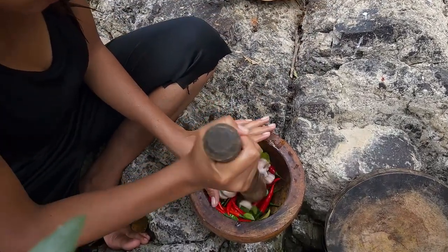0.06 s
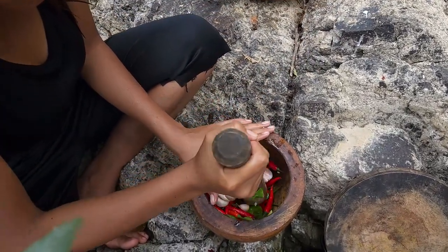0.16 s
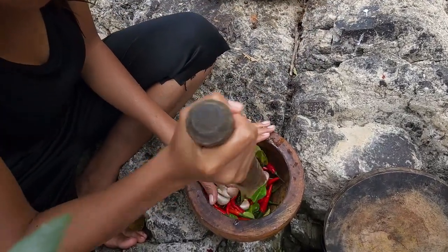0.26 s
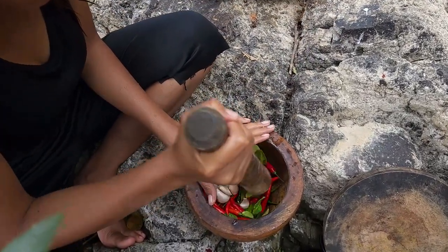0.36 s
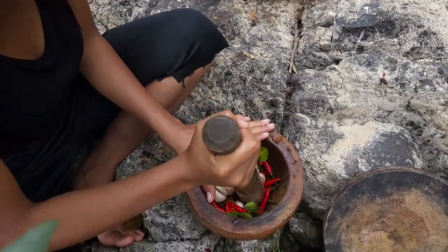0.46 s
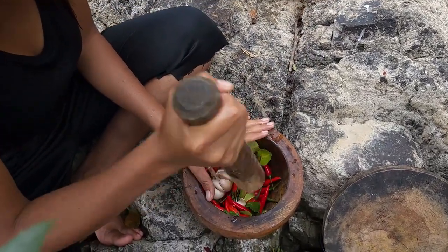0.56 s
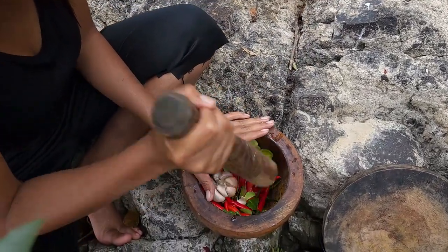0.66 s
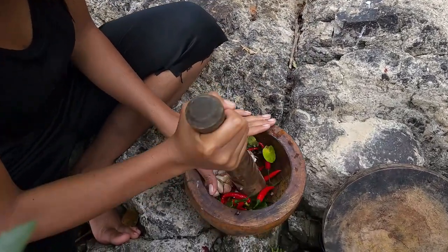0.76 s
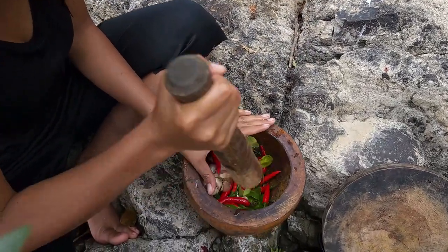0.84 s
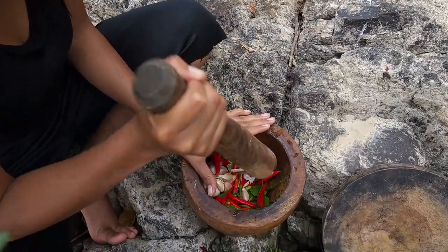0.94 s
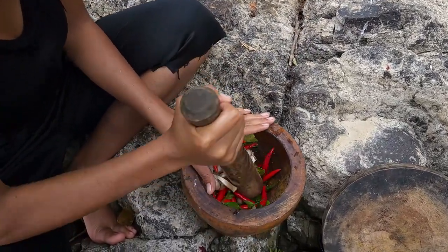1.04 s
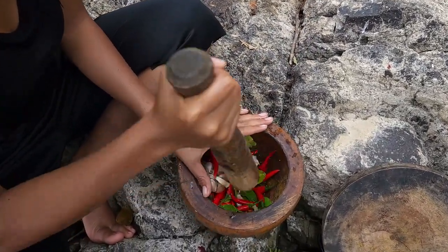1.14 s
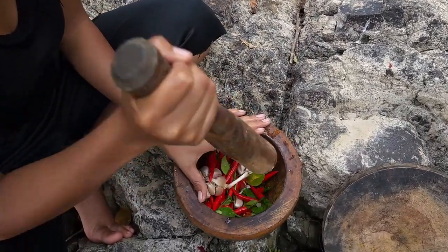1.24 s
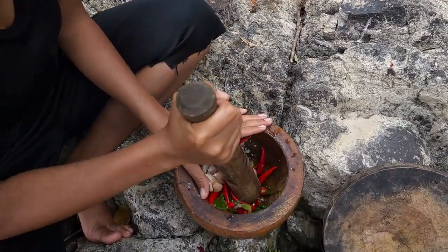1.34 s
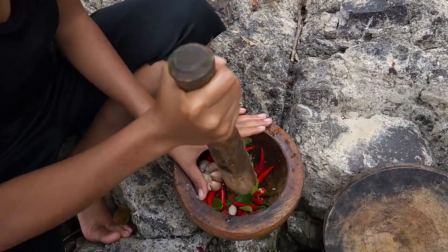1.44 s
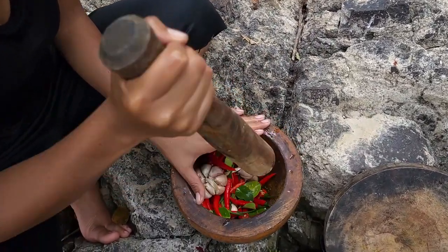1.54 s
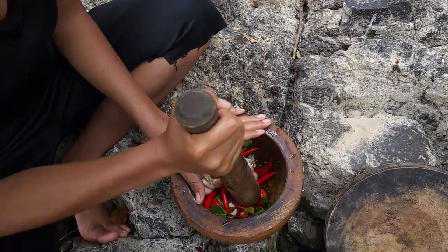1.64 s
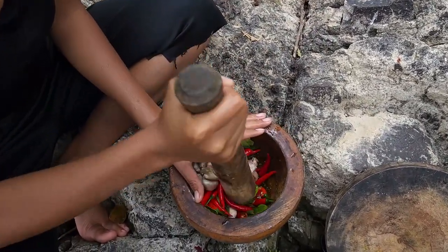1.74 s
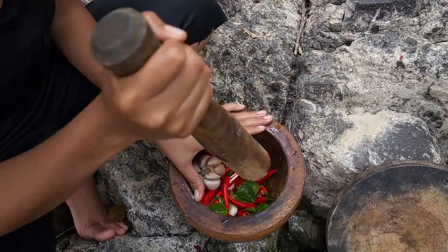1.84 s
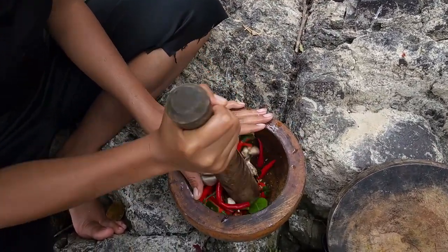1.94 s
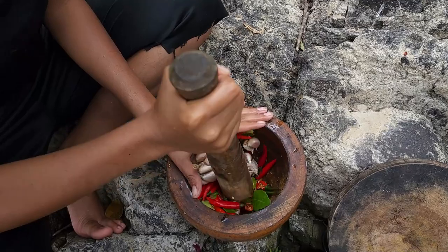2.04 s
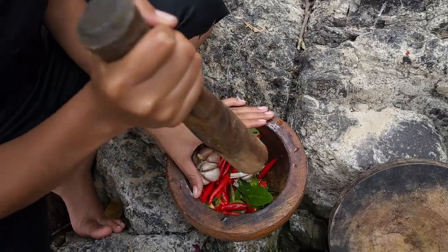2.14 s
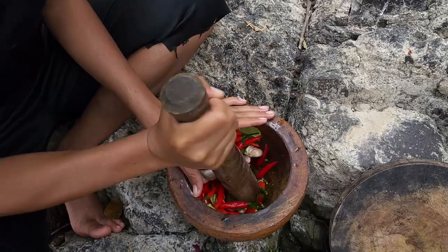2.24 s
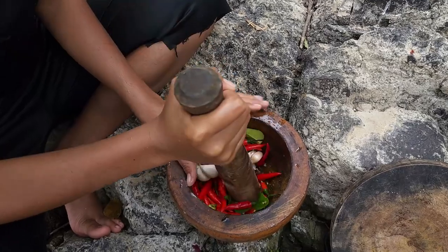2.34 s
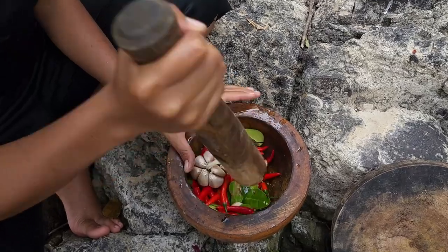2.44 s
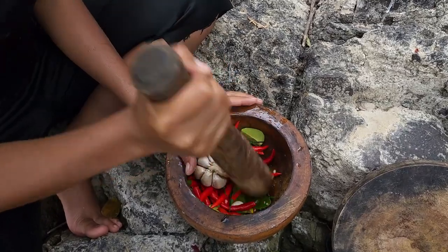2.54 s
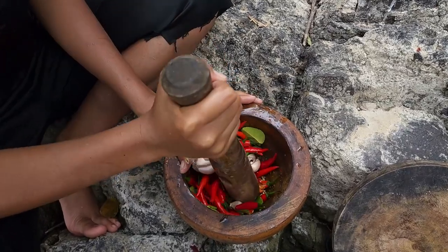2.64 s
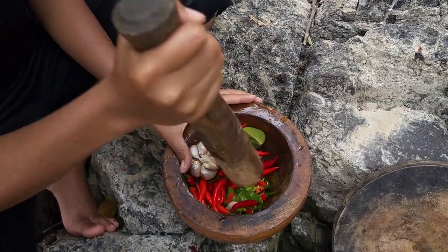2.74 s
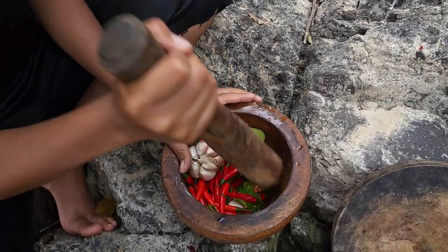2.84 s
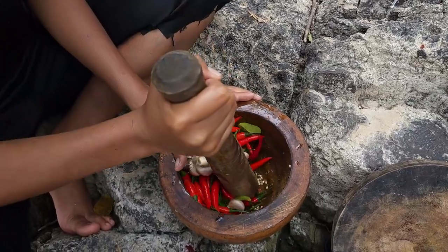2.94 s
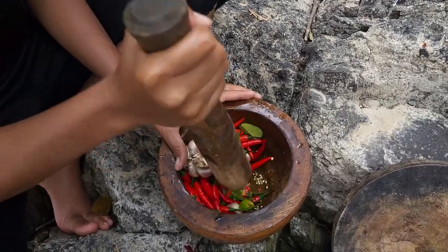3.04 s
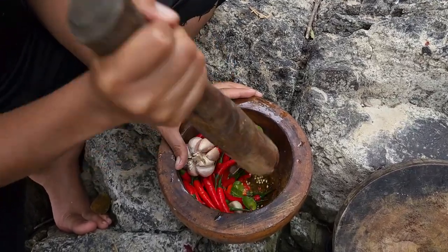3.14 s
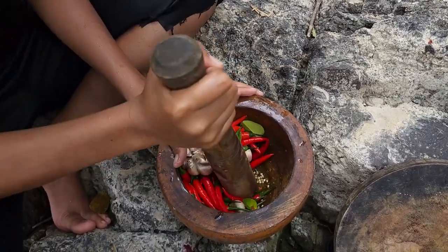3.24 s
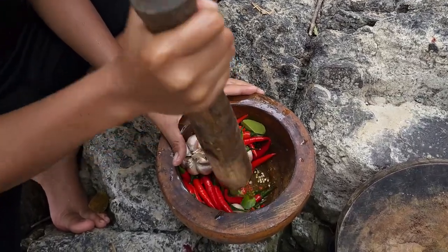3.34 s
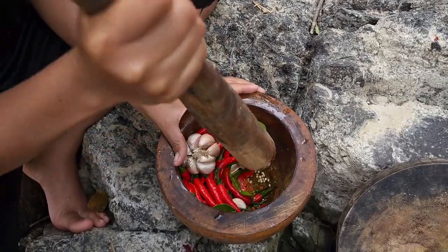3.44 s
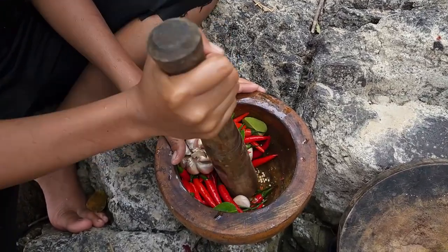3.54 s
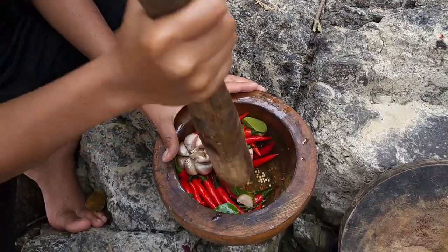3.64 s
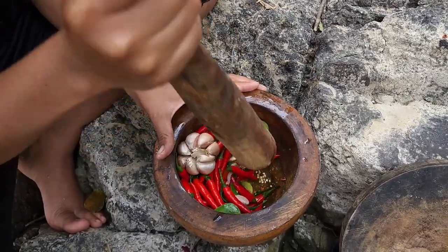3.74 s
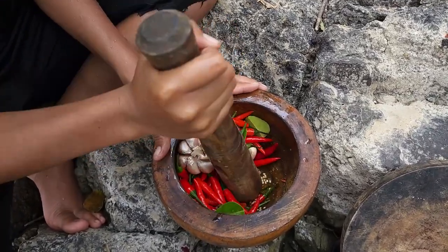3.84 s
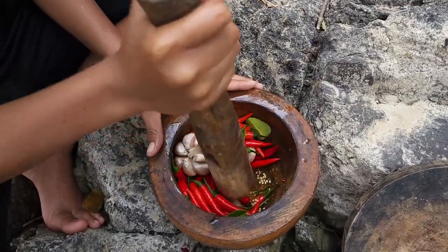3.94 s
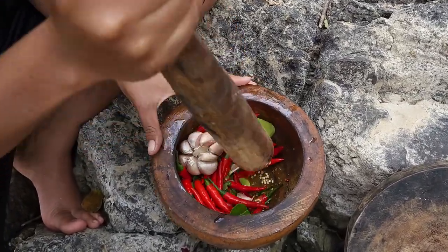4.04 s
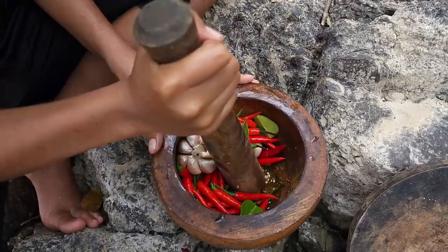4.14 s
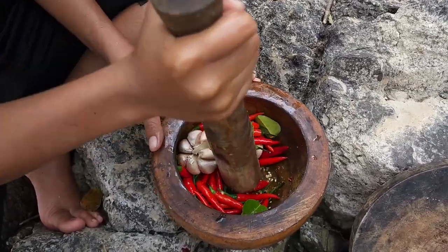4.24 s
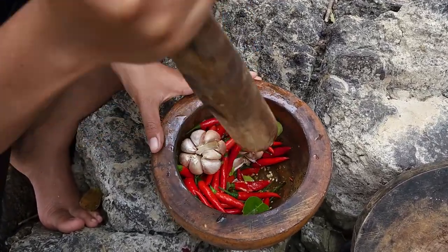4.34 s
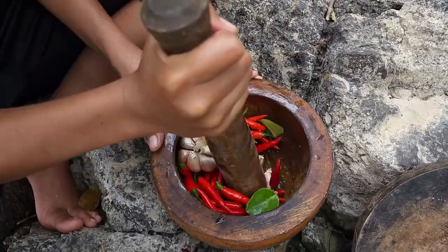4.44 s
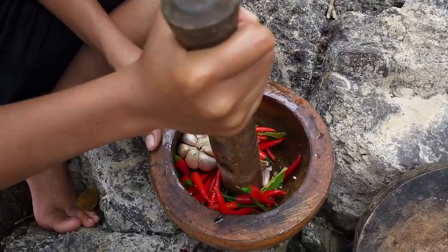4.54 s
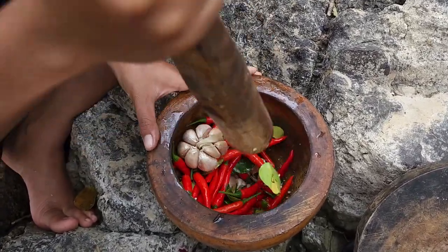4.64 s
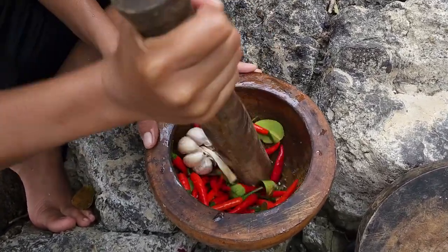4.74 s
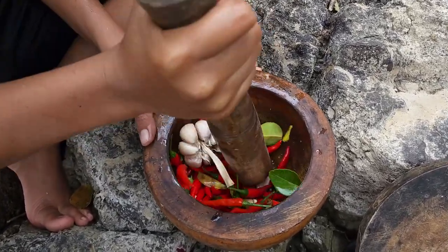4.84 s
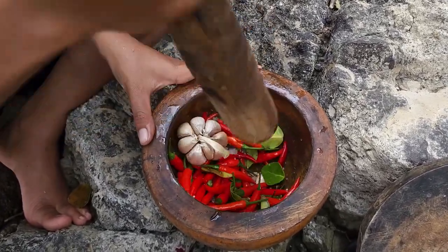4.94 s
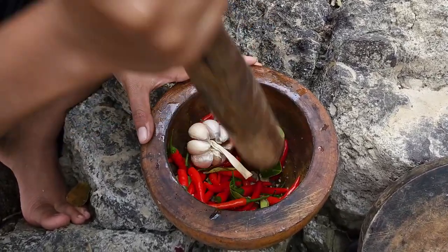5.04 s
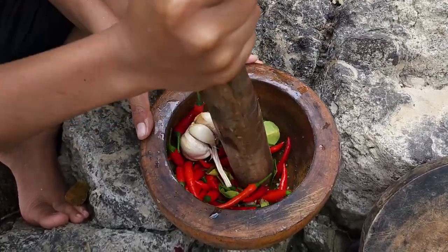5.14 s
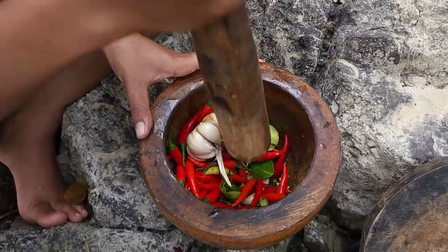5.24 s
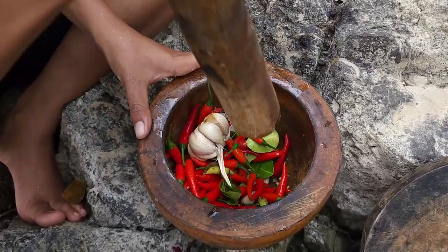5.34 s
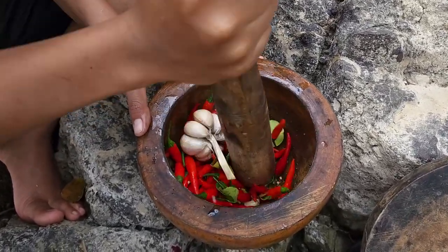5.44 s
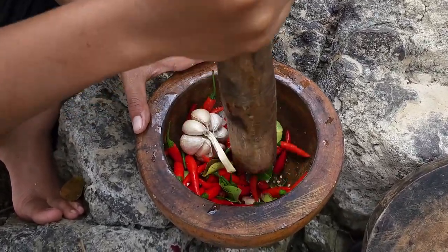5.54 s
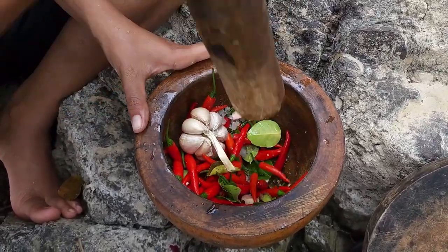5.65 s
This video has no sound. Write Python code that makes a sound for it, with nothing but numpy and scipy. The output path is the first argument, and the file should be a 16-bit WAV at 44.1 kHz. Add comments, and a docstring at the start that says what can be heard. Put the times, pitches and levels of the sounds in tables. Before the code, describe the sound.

Close, dry blows of a wooden pestle in a clay mortar, about three per second, each mixing a low knock with a short wet crunch of chillies. Early blows are duller; around three to four seconds several ring hard and hollow, then they ease. A stream rushes and gurgles steadily beneath, with tiny splashes. Outdoors, close stereo microphones, very little echo.

```python
"""Beside a forest stream, a wooden pestle pounds chillies and leaves in a clay mortar on a rock.
Each blow crushes the filling in a burst of tiny snaps, and its knocks set the bowl ringing.
Splashes and gulps are single rings; the stream is filtered noise with crowds of bubble rings.
Two spaced microphones hear it all; a limiter ducks under the hardest blows and recovers slowly."""
import sys
import numpy as np
from scipy import signal
from scipy.fft import rfft, irfft, next_fast_len
from scipy.io import wavfile
from scipy.ndimage import uniform_filter1d, minimum_filter1d, map_coordinates

SR = 44100
rng = np.random.default_rng(int(sys.argv[2]) if len(sys.argv) > 2 else 0)


def file_out(sig):
    """Save sig as 16-bit WAV at sys.argv[1]."""
    # one column per channel
    cols = np.atleast_2d(sig).T
    # limit, then scale
    lim = np.clip(cols, -1, 1)
    pcm = np.round(lim * 32767).astype(np.int16)
    wavfile.write(sys.argv[1], SR, pcm)


N = 250929
SIZE = next_fast_len(N + 4096)   # transform length, with room for echoes
HZ = np.maximum(np.arange(SIZE // 2 + 1) * SR / SIZE, 1)   # frequency of every bin

# blows of the pestle into the filling: stop_s, crush_db, sink_ms (from first touch to stop),
# touch_db (first touch), fall_ms, treble_db (treble against the rest), thump_db (on the rock)
BLOWS = [(0.1023, -26, 15.3, -38, 7.3, -7.5, -38), (0.4226, -26, 10, -27, 3.8, 3, -30.5),
         (0.7235, -20, 7.7, -30, 5.6, -3.5, -34), (1.03, -28, 14.2, -25, 3.8, 2, -26.5),
         (1.333, -22, 16.4, -34.5, 9.4, -2.5, -52), (1.6498, -22.5, 9.6, -34.5, 5.7, -4, -27),
         (1.951, -22, 8.6, -42, 10.2, -3.5, -25.5), (2.27, -19, 6, -26.5, 4, -4.5, -29.5),
         (2.597, -21.5, 6, -33, 3.5, -9.5, -24), (2.9112, -23, 9.9, -25, 2.6, -2.5, -26),
         (3.22, -26, 9.6, -34.5, 4.8, -7.5, -54), (3.527, -24, 18.5, -42, 7.2, -9.5, -56),
         (3.8425, -22, 10.7, -20.5, 3.8, 1, -23.5), (4.1422, -11.5, 6.2, -39, 4.1, -7.5, -56),
         (4.47, -25.5, 23.5, -25, 2.6, -3.5, -24), (4.771, -19.5, 9.1, -30, 9.9, -7.5, -30.5),
         (5.0987, -16, 11.2, -32.5, 2.4, -5.5, -30), (5.439, -20, 20.7, -33, 1.9, -0.5, -24)]


def mortar():
    """Knocks and crush reach both microphones; part of the crush scatters its treble to one side only."""
    # loudness difference between the sides: pitch_hz, left_minus_right_db
    mortar_pan = [(60, 3), (110, -3), (200, 3), (380, -1), (520, 3.5), (625, 5.5), (760, 0), (1290, 5.5),
                  (2380, -0.5), (4400, 0.5), (8120, 1.5), (15000, -0.5)]
    # paths to the microphones, direct and off the rock: left_ms, right_ms, gain (a plain factor)
    echo_paths = [(0, 0.092, 1.0), (0.247, 0.705, 0.012), (0.898, 1.364, -0.074), (2.1, 1.43, 0.02)]
    shared, left, right = crush()
    paths = sum(gain * lag([left_ms, right_ms]) for left_ms, right_ms, gain in echo_paths)
    sides = pan(mortar_pan)
    pounding = knocks() + 0.64 * shared
    direct = through(pounding, paths * sides)
    treble_only = 1 / (1 + (3000 / HZ) ** 2)
    scattered = through(np.array([left, right]), treble_only * sides)
    return direct + 1.46 * scattered + banks(pounding)


def knocks():
    """Each contact pushes the bowl's modes for a cycle or so; the rock takes one thump a blow."""
    # pestle meets bowl: start_s, knock_db (dull), ring_db (hollow), tick_db
    contacts = [(0.1008, -25.5, -39, -52), (0.4122, -52, -32, -46), (0.424, -25, -38, -40),
                (0.7214, -32, -34.5, -40), (1.024, -14, -33, -39), (1.3298, -22.5, -52, -35),
                (1.334, -49.5, -56, -23.5), (1.65, -11.5, -28.5, -55.5), (1.9443, -25, -29, -43),
                (1.9522, -28, -26.5, -32), (1.9568, -20, -34, -34), (1.9643, -22, -36, -33),
                (2.2612, -55, -18, -51), (2.2693, -11, -32, -18.5), (2.595, -14, -13, -22),
                (2.5987, -35, -17.5, -22), (2.9026, -14.5, -21, -42), (2.9102, -17.5, -14.5, -41.5),
                (3.218, -14, 0, -17.5), (3.525, -12, 4.5, -16), (3.832, -29, -19.5, -33),
                (3.8405, -13.5, -12.5, -30), (4.145, -8, -0.5, -32), (4.475, -13, -15, -32),
                (4.7692, -45, -25, -45), (4.779, -34, -19.5, -23.5), (5.0892, -48, -24, -29),
                (5.0963, -20, -17, -42), (5.4324, -25, -19.5, -48)]
    # where the four strengths apply (knock, ring, upper ring, tick): pitch_hz
    strength_hz = [310, 620, 780, 1900]
    # modes of bowl, pestle and rock: pitch_hz, level_db, t60_s (time to fade by 60 dB),
    # swing (a factor: above 0 the first swing goes out, below 0 it goes in)
    modes = [(54.2, -4.5, 0.18, 0.77), (150, 6, 0.039, 1), (311.7, 2.5, 0.028, -0.96),
             (439.4, -1, 0.028, 0.98), (617.5, 1, 0.038, 0.78), (765.6, -3, 0.028, -0.84),
             (1030, -5.5, 0.032, 0.49), (1360, -11.5, 0.03, 0.91), (1600, -8, 0.0043, -0.85),
             (1890, -4.5, 0.027, 1), (3140, -19, 0.029, -1.2)]
    upper_growth = 1.67   # dB of upper ring per dB of ring: hard contacts wake it
    rock_hz, thump_lead_ms = 200, 1.3   # modes below rock_hz answer the thump, just before the stop
    bounce_ms, bounce_db = 20, -29.5   # the pestle rebounds once after each contact
    start_s, knock_db, ring_db, tick_db = np.transpose(contacts)
    strengths = np.transpose([knock_db, ring_db, upper_growth * ring_db, tick_db])
    blows, out = np.array(BLOWS), np.zeros(N)
    for hz, level_db, t60_s, swing in modes:
        if hz < rock_hz:
            hit_s, strength_db = blows[:, 0] - thump_lead_ms / 1000, blows[:, -1]
        else:
            hit_s = start_s
            strength_db = np.array([np.interp(np.log(hz), np.log(strength_hz), row) for row in strengths])
        clicks = np.zeros(N)
        clicks[np.round(hit_s * SR).astype(int)] = swing * from_db(level_db + strength_db)
        clicks += from_db(bounce_db) * np.roll(clicks, round(bounce_ms * SR / 1000))
        # a mode radiates little below its pitch
        low_cut = signal.butter(3, .5 * hz, "high", fs=SR, output="sos")
        out += signal.sosfilt(low_cut, swell(clicks, hz, t60_s, cycles=0.61))
    return out


def crush():
    """Skins and seeds burst in dense snaps that swell as the pestle sinks in and die as it stops."""
    # tone of the snaps: pitch_hz, level_db
    crush_colour = [(150, 4), (330, 16), (500, -3), (650, 11.5), (1100, -3), (1900, -0.5), (2700, -4),
                    (3400, 2), (4500, -4.5), (8500, -1.5), (16000, 7)]
    t = np.arange(N) / SR
    dull_power, bright_power = np.zeros(N), np.zeros(N)
    for peak_s, level_db, rise_ms, fall_ms, treble_db in bursts():
        near = slice(max(round((peak_s - .15) * SR), 0), round((peak_s + .2) * SR))
        ms = (t[near] - peak_s) * 1000
        shape = np.where(ms < 0, ms / max(rise_ms, .3), -ms / max(fall_ms, .3))
        power = from_db(2 * level_db) * np.exp(2 * shape)
        # half the treble change in each part, since these are powers
        dull_power[near] += power * from_db(-treble_db)
        bright_power[near] += power * from_db(treble_db)
    colour = from_db(at_hz(crush_colour))
    bright = 1 / (1 + (5500 / HZ) ** 4)
    snaps = np.zeros((3, N))   # shared, left only, right only
    for spot in range(3):
        dry_cracks = rms_one(grains(per_s=9700, spread_db=4.5))
        wet_pops = pops(low_hz=1256, high_hz=15640, per_s=2400, cycles=17.4, spread_db=3.0, count=11)
        snaps[spot] = rms_one(through(dry_cracks + 0.66 * wet_pops, colour))
    dull_part = np.sqrt(dull_power) * through(snaps, 1 - bright)
    return dull_part + np.sqrt(bright_power) * through(snaps, bright)


def bursts():
    """Touch, stop and slump of every blow, each as peak_s, level_db, rise_ms, fall_ms, treble_db."""
    touch_rise_ms, duller_db = 3.6, -5   # the first touch is abrupt; touch and slump are duller
    touch_fall, stop_rise = 0.88, 0.46   # shares of the sinking time
    settle_db, settle_ms = -18.5, 17   # the filling slumps after the stop
    for stop_s, crush_db, sink_ms, touch_db, fall_ms, treble_db, _ in BLOWS:
        dull_db = treble_db + duller_db
        yield stop_s - sink_ms / 1000, touch_db, touch_rise_ms, touch_fall * sink_ms, dull_db
        yield stop_s, crush_db, stop_rise * sink_ms, fall_ms, treble_db
        yield stop_s, crush_db + settle_db, fall_ms, settle_ms, dull_db


def banks(x):
    """Rocks and trees along the banks send back a short diffuse tail, unlike on the two sides."""
    tail_db, t60_s, delay_ms = -19.5, 0.13, 9
    t = np.arange(round(.3 * SR)) / SR
    tail = rng.standard_normal((2, len(t))) * from_db(-60 * t / t60_s)
    tail = tail / np.sqrt(np.sum(tail ** 2, axis=1, keepdims=True))
    softer_treble = 1 / (1 + (HZ / 3000) ** 2)
    return from_db(tail_db) * through(x, rfft(tail, SIZE) * lag(delay_ms) * softer_treble)


def drops():
    """Splashes are a short bright ring with a thin snap on top, gulps a long low ring."""
    # splashes and popping juice: start_s, level_db, pitch_hz, snap_db
    splashes = [(0.502, -44, 4400, -48), (0.616, -45, 4370, -38), (.6714, -49, 4070, -49),
                (.7954, -51, 7220, -43), (0.978, -40.5, 2980, -48), (1.1241, -43, 8560, -41),
                (1.3078, -35, 4630, -39), (1.4267, -39.5, 3950, -52), (1.508, -38.5, 4180, -51),
                (1.531, -42, 3570, -61), (1.861, -49, 4130, -46), (2.0677, -41, 4490, -50),
                (2.3127, -39, 6310, -54), (2.625, -42, 4280, -52), (2.99, -43, 4390, -55),
                (3.307, -42, 4260, -44), (3.5947, -42, 6410, -50), (4.8704, -39.5, 4370, -48),
                (4.8968, -49, 5230, -32), (5.0698, -44, 4000, -38), (5.1598, -41, 8300, -35),
                (5.646, -52, 5290, -42), (5.68, -44, 5800, -52)]
    # deep gulps of water under the rocks: start_s, level_db, pitch_hz
    gulps = [(.183, -30, 163), (1.063, -40, 150), (5.621, -32, 154.3), (5.658, -37, 87.5)]
    ring_cycles = 33   # cycles until a splash has faded by 60 dB
    pan_centre_db, pan_spread_db = -2.5, 5   # left minus right
    snap_ms = 3.0   # time for a snap to fall to about a third
    out, snaps = np.zeros((2, N)), np.zeros((2, N))
    fade = np.exp(-np.arange(400) / (snap_ms * SR / 1000))
    noises = rng.standard_normal((len(splashes), 2, 400)) * fade
    places_db = pan_centre_db + pan_spread_db * rng.standard_normal(len(splashes))
    for (start_s, level_db, hz, snap_db), noise, pan_db in zip(splashes, noises, places_db):
        at, sides = round(start_s * SR), from_db([[pan_db / 2], [-pan_db / 2]])
        click = np.eye(1, min(2048, N - at))[0]   # a single one, then zeros
        splash = swell(click, hz, ring_cycles / hz, cycles=19.0)
        out[:, at:at + 2048] += from_db(level_db) * splash * sides
        snaps[:, at:at + 400] += from_db(snap_db) * noise * sides
    for start_s, level_db, hz in gulps:
        at = round(start_s * SR)
        click = np.eye(1, min(SR // 2, N - at))[0]
        out[:, at:at + SR // 2] += from_db(level_db) * swell(click, hz, 17.0 / hz, cycles=2.2)
    return out + through(snaps, 1 / (1 + (5000 / HZ) ** 4))   # snaps keep only their treble


def stream():
    """White water is noise from several directions, with bubbles, spray, a low gurgle and a deep rumble."""
    # the water over time: start_s, rush_db, rumble_db (deep bass)
    flow = [(0, -44, -67), (.9, -44, -91), (1.6, -44, -49), (2.1, -44, -85), (2.8, -44, -50),
            (3.5, -44, -43), (4, -42.5, -52), (4.5, -42.5, -47), (5.2, -44, -47.5), (5.69, -46, -60)]
    # tone of the rush: pitch_hz, level_db (per Hz, shape only)
    rush_colour = [(25, -16), (60, -4), (150, 2), (300, 4.5), (600, 2), (1000, 3), (2000, -4.5),
                   (4000, -11.5), (8000, -17.5), (16000, -8)]
    # loudness difference between the sides: pitch_hz, left_minus_right_db
    rush_pan = [(60, -1), (110, 1), (200, 6.5), (380, -5.5), (700, 3), (1290, -0.5), (2380, -2.5),
                (4400, -4), (8120, 1), (15000, -1)]
    # where the water is heard from: right_lag_ms (behind left), level_db, tilt_db (per octave, about 1 kHz)
    reaches = [(0.52, -4.5, -4), (-0.514, -11, -1.5), (0.431, -3, 2), (0.36, -6, 2.8), (-0.136, -10.5, 2.5),
               (-0.24, -5, -4.6)]
    # how alike the sides are: pitch_hz, common_share (0 to 1)
    likeness = [(300, 0.62), (1000, 0.98), (3000, 0.83), (7000, 0.62), (16000, 0.04)]
    gurgle_db, spray_db = -3.5, -20.5   # against the rush
    start_s, rush_db, rumble_db = np.transpose(flow)
    t = np.arange(N) / SR
    alike = np.clip(at_hz(likeness), 0, 1)

    rush = 0
    for ms, level_db, tilt_db in reaches:
        noise = rng.standard_normal((3, N)) * from_db(2.2 * drift(21))
        common, left, right = rfft(noise, SIZE)
        sides = np.sqrt(alike) * common * lag([-ms / 2, ms / 2])
        sides = sides + np.sqrt(1 - alike) * np.array([left, right])
        rush = rush + sides * from_db(level_db + tilt_db * np.log2(HZ / 1000))
    rush = rms_one(irfft(rush * from_db(at_hz(rush_colour)) * pan(rush_pan), SIZE)[:, :N])
    for ms, level_db, _ in reaches[:2]:   # the two near falls let clumps of bubbles stand out
        fizz = pops(low_hz=917, high_hz=5130, per_s=1500, cycles=48, spread_db=3.0, count=16)
        fizz_gain = from_db(level_db - 9.5 + 3.4 * drift(10.0))
        rush = rush + fizz_gain * through(fizz, lag([-ms / 2, ms / 2]))
    # scattered droplets from the left: the right side hears them half a millisecond later
    spray = pops(low_hz=3600, high_hz=6500, per_s=260, cycles=36, spread_db=2.5, count=7)
    rush = rush + from_db(spray_db) * np.array([spray, np.roll(spray, 22)])

    gurgle = pops(low_hz=108.0, high_hz=181.6, per_s=200, cycles=19, spread_db=3.5, count=6)
    higher = pops(low_hz=312.2, high_hz=666.6, per_s=250, cycles=26.7, spread_db=2.0, count=6)
    gurgle = gurgle + from_db(-7.0) * higher
    deep = signal.butter(2, [28, 90], "band", fs=SR, output="sos")
    rumble = rms_one(signal.sosfilt(deep, rng.standard_normal(N) * from_db(3.5 * drift(14))))
    layers = zip((rush_db, rush_db + gurgle_db, rumble_db), (rush, gurgle, rumble))
    return sum(from_db(np.interp(t, start_s, level_db)) * layer for level_db, layer in layers)


def pops(low_hz, high_hz, per_s, cycles, spread_db, count):
    """Small bursts of many sizes, each fading by 60 dB within some cycles of its pitch; rms 1."""
    clicks = grains(per_s, spread_db)
    dealt = rng.integers(0, count, N)   # which pitch each click gets
    pitches = np.geomspace(low_hz, high_hz, count)
    return rms_one(sum(swell(clicks * (dealt == k), hz, cycles / hz, cycles / 3)
                       for k, hz in enumerate(pitches)))


def grains(per_s, spread_db):
    """Random clicks of uneven size, pushing either way."""
    sizes = from_db(spread_db * np.minimum(rng.exponential(1, N), 5)) * rng.choice([-1, 1], N)
    return sizes * (rng.random(N) < per_s / SR)


def swell(clicks, hz, t60_s, cycles):
    """A ring whose drive lasts some cycles, so that it builds up and keeps to its own pitch."""
    drive_t60_s = max(cycles, .5) / hz
    drive = ring(clicks, hz, drive_t60_s)
    return ring(drive, hz, t60_s) * 2 * np.log(1000) / (drive_t60_s * SR)


def ring(clicks, hz, t60_s):
    """A click of size 1 sets a fading sine ringing from a height of 1."""
    r, w = from_db(-60 / (t60_s * SR)), 2 * np.pi * hz / SR   # shrink and turn per sample
    return signal.lfilter([0, np.sin(w)], [1, -2 * r * np.cos(w), r * r], clicks + 1e-18)


def drift(rate):
    """A smooth random curve through about rate new values a second, drawn with spread 1."""
    steps = rng.standard_normal(400)
    return map_coordinates(steps, [np.arange(N) / SR * rate + 3], order=3)


def from_db(db):
    """Gain of a level in dB."""
    return 10 ** (np.asarray(db) / 20)


def rms_one(x):
    """Scaled to rms 1, a standard average loudness."""
    return x / np.sqrt(np.mean(x ** 2) + 1e-20)


def at_hz(points):
    """A table of pitch_hz and value, read at every frequency bin."""
    hz, values = np.array(points).T
    return np.interp(np.log(HZ), np.log(np.maximum(hz, 1)), values)


def through(x, response):
    """A sound passed through a frequency response."""
    return irfft(rfft(x, SIZE) * response, SIZE)[..., :N]


def lag(ms):
    """Response of a pure delay: each frequency turns by its own angle."""
    return np.exp(-2j * np.pi * HZ * np.asarray(ms)[..., None] / 1000)


def pan(table):
    """Left and right gains per bin: half the difference up on one side, half down on the other."""
    return from_db(at_hz(table) * [[.5], [-.5]])


def scene():
    """Mortar, splashes and stream together."""
    return mortar() + drops() + stream()


def record(dry):
    """Microphone colour, a peak limiter that holds and then lets go slowly, and the top cut."""
    # tone of the microphones: pitch_hz, level_db
    mic_colour = [(20, -7.5), (8500, 5.5), (10200, -6.5), (11500, -4.5), (16000, -8.5)]
    limit_db, hold_s, release_db_per_s = -4.5, 1, 6.5
    x = through(dry, from_db(at_hz(mic_colour)))
    peak_db = 20 * np.log10(np.abs(x).max(axis=0) + 1e-9)   # the louder side rules both
    over_db = np.maximum(peak_db - limit_db, 0)
    hold = round(hold_s * SR)
    held_db = -minimum_filter1d(-over_db, hold, origin=(hold - 1) // 2, mode="nearest")
    slope_db = release_db_per_s * np.arange(N) / SR
    duck_db = np.maximum.accumulate(held_db + slope_db) - slope_db
    # smoothed, and acting half a millisecond ahead
    duck_db = uniform_filter1d(np.roll(duck_db, -24), size=48, mode="nearest")
    top_cut = signal.cheby2(16, 70, 16150, fs=SR, output="sos")   # 70 dB down from 16150 Hz up
    return signal.sosfilt(top_cut, x * from_db(-duck_db))


dry = scene()
out = record(dry)
file_out(out)
```